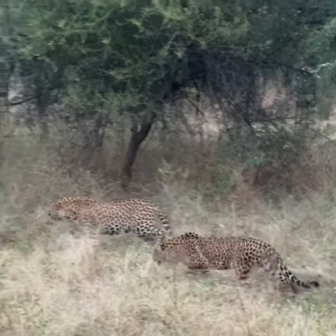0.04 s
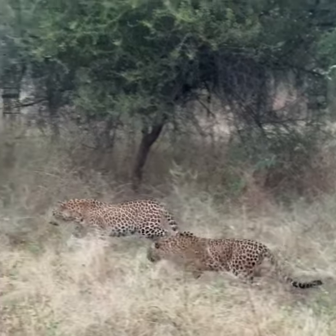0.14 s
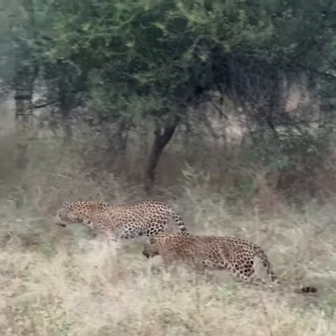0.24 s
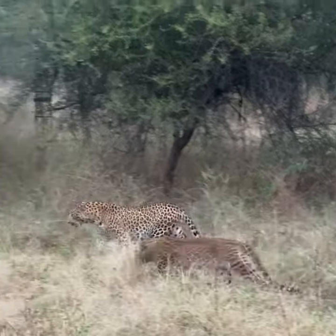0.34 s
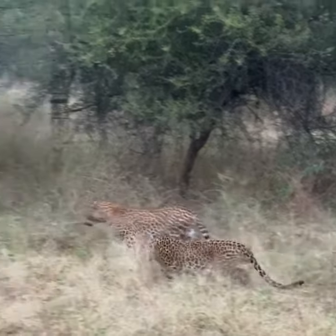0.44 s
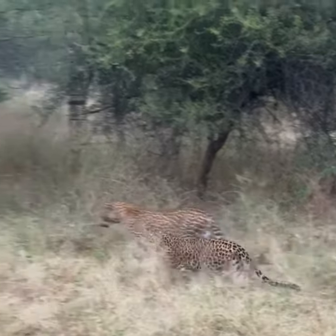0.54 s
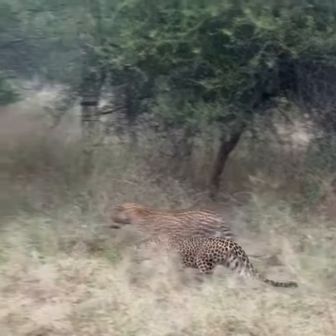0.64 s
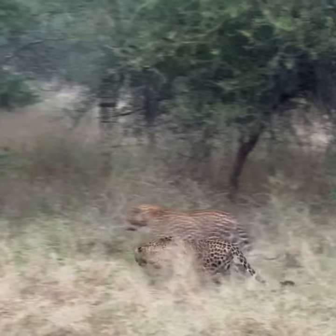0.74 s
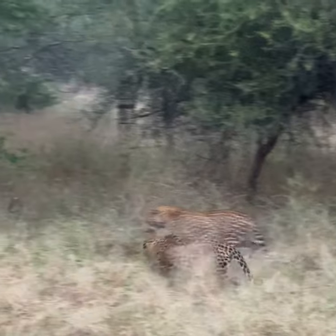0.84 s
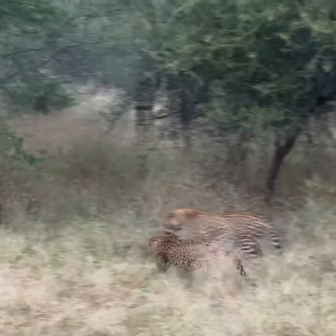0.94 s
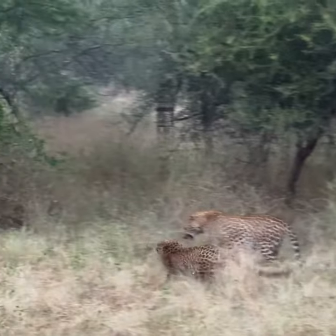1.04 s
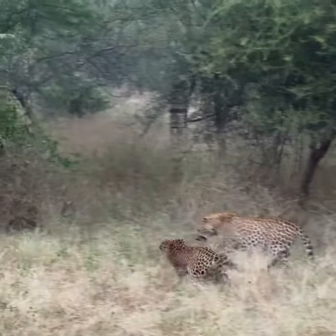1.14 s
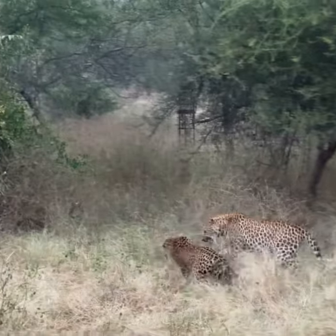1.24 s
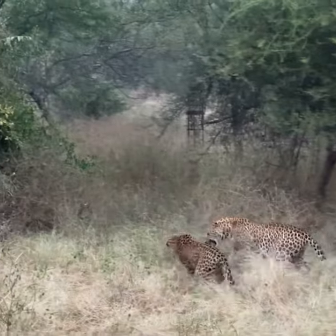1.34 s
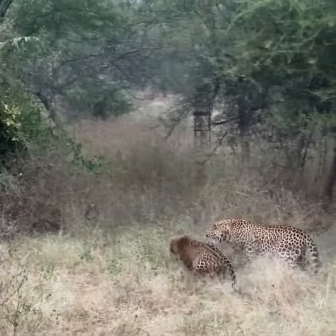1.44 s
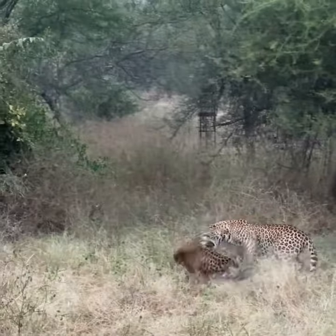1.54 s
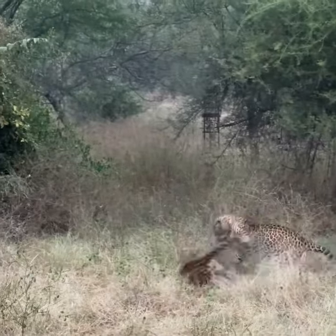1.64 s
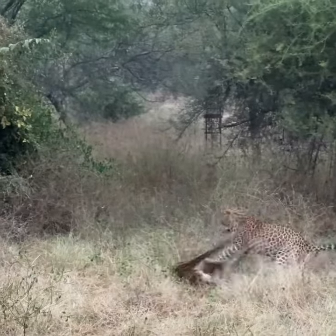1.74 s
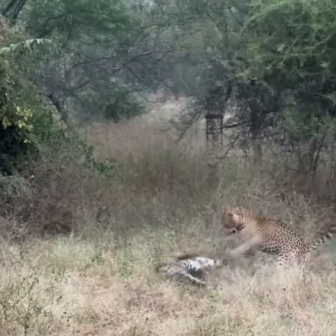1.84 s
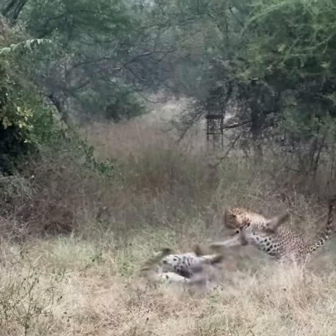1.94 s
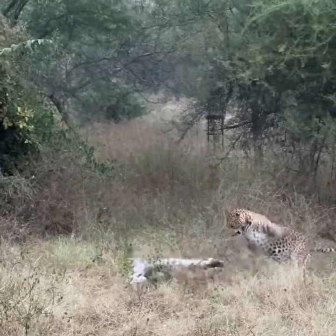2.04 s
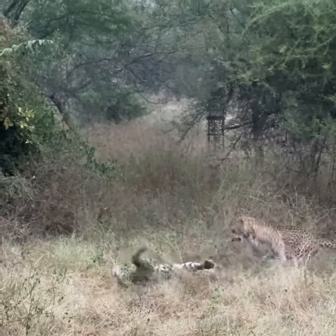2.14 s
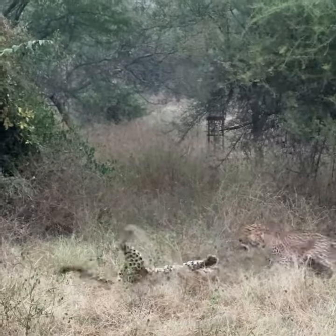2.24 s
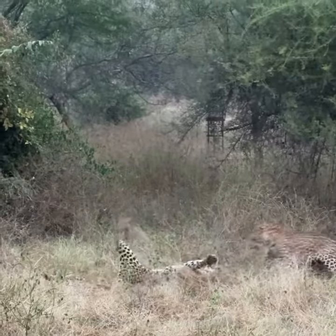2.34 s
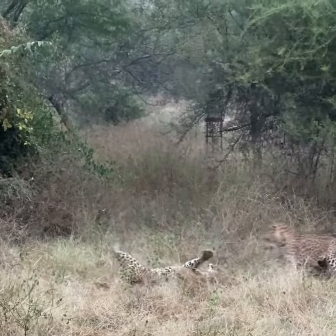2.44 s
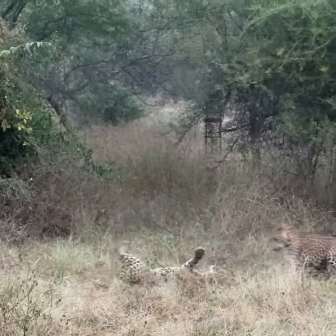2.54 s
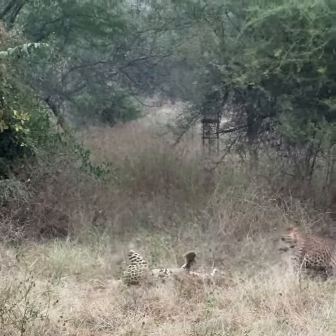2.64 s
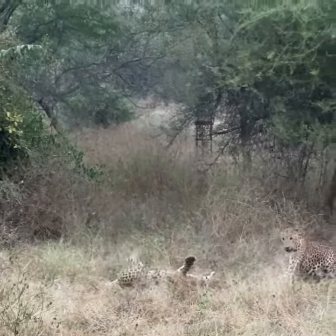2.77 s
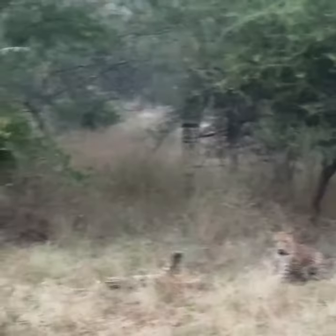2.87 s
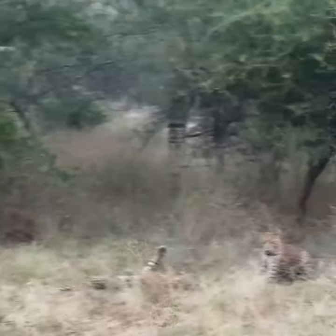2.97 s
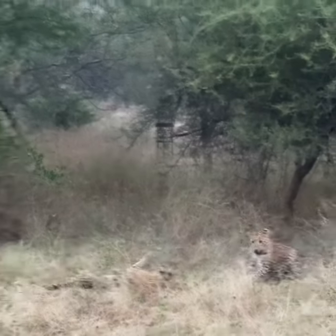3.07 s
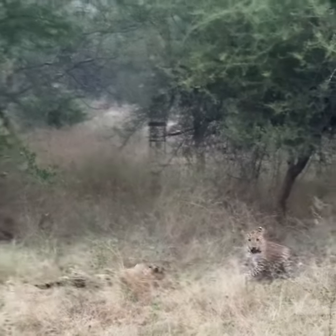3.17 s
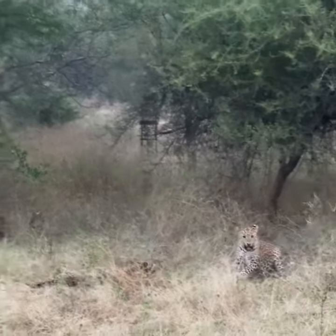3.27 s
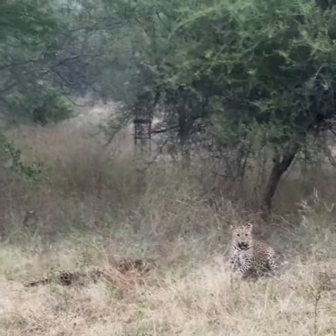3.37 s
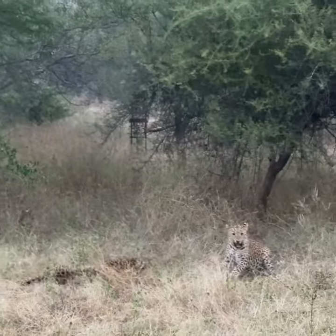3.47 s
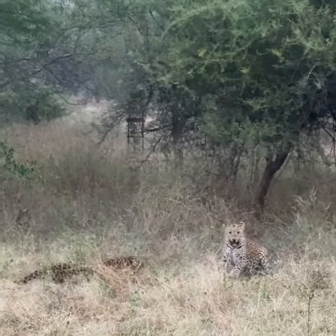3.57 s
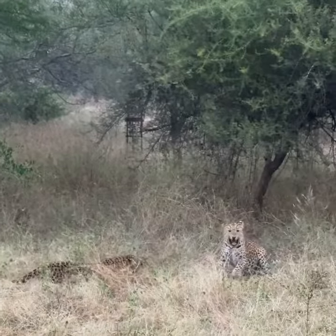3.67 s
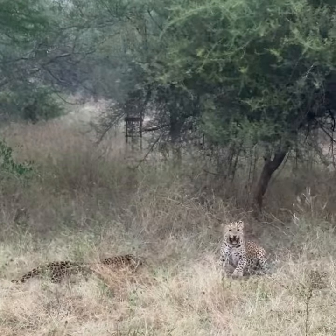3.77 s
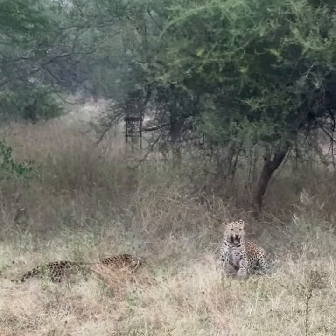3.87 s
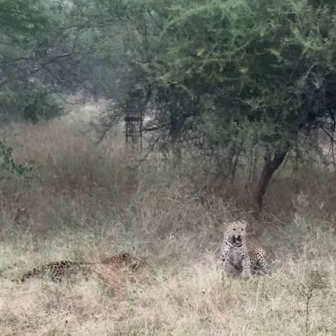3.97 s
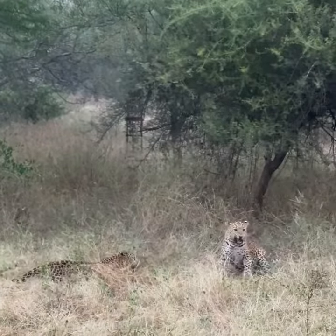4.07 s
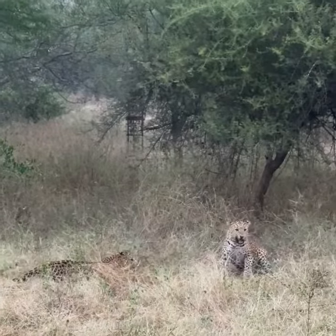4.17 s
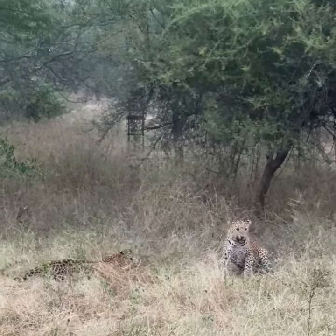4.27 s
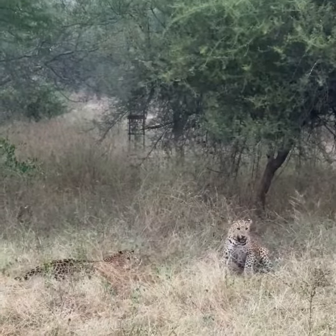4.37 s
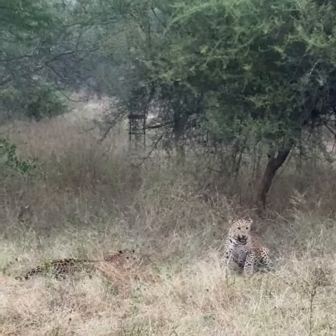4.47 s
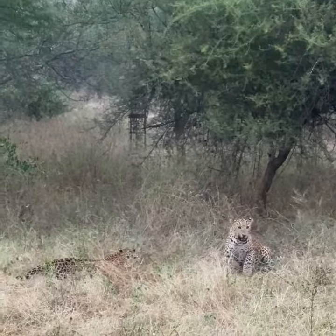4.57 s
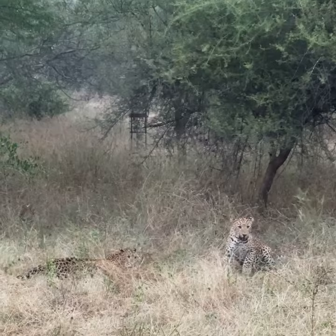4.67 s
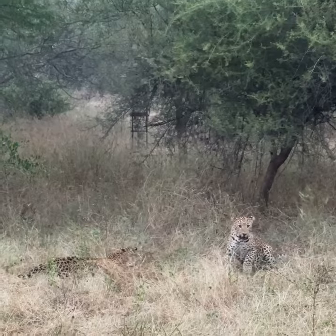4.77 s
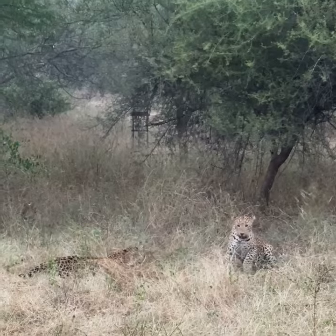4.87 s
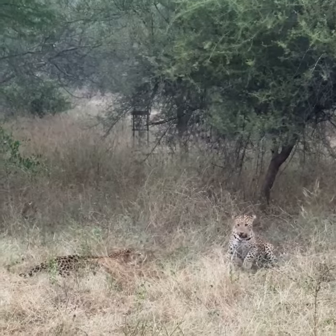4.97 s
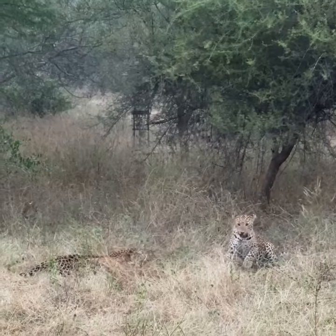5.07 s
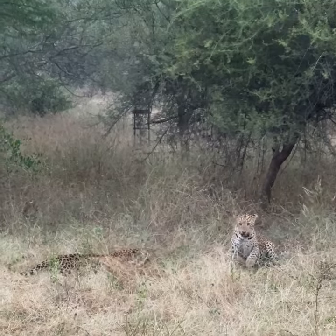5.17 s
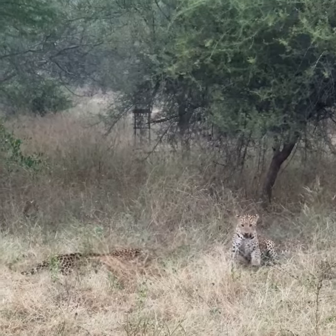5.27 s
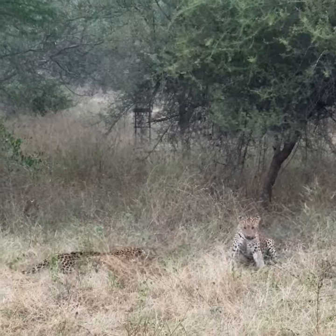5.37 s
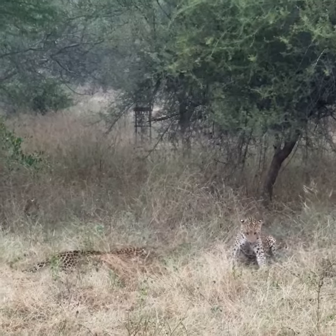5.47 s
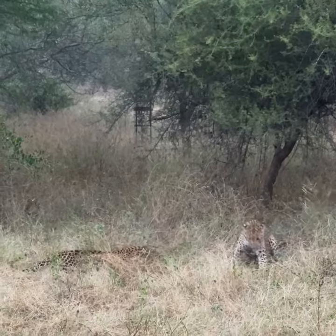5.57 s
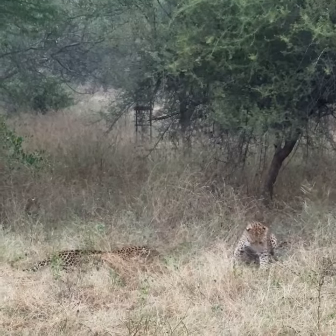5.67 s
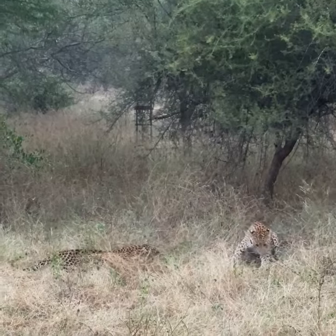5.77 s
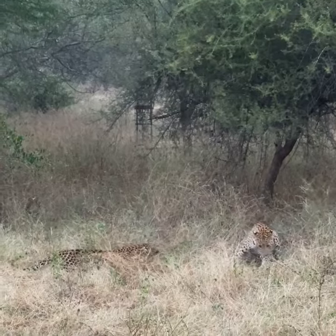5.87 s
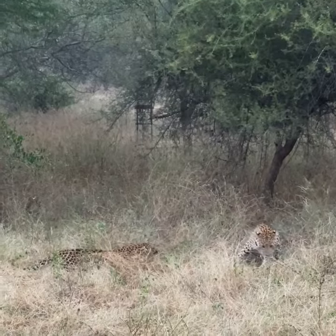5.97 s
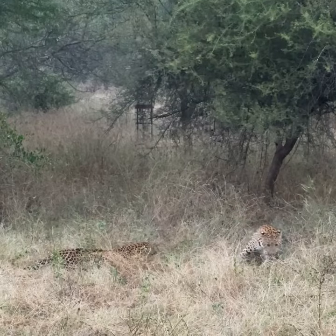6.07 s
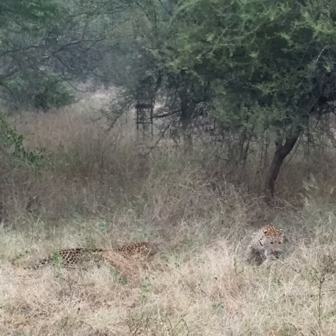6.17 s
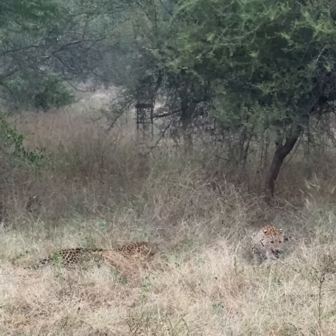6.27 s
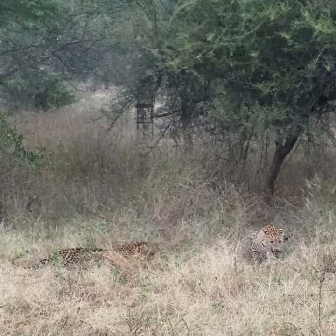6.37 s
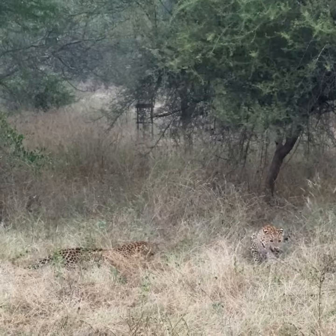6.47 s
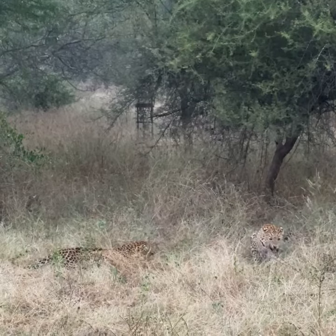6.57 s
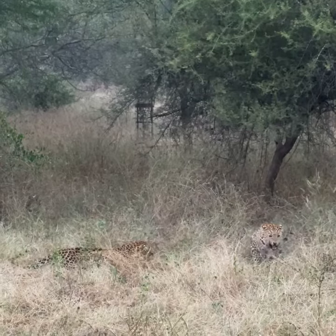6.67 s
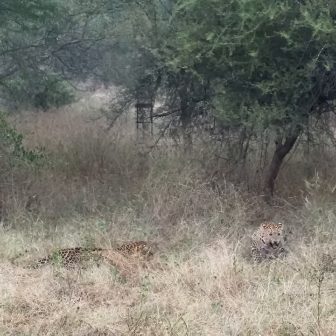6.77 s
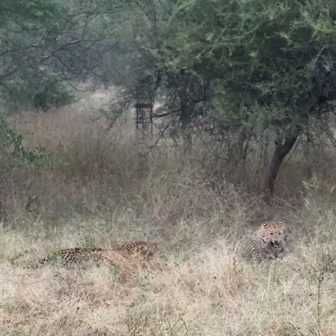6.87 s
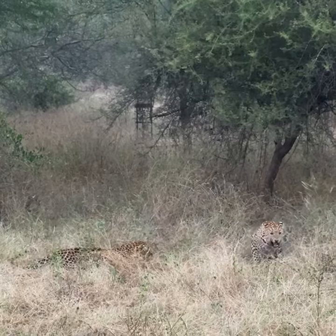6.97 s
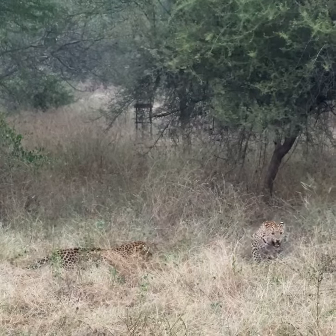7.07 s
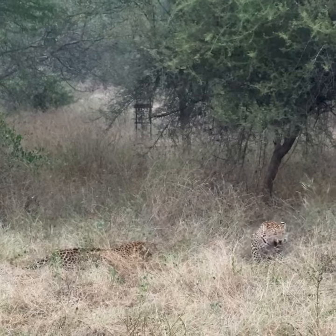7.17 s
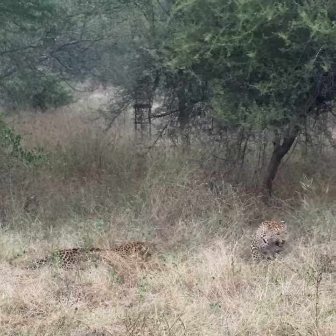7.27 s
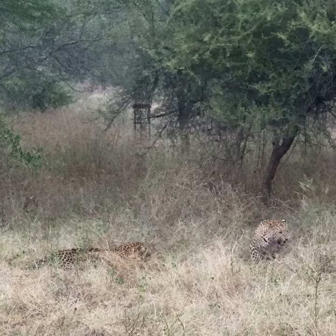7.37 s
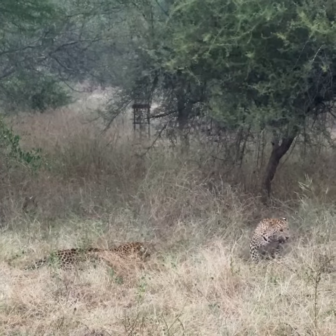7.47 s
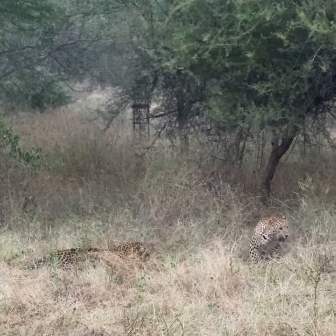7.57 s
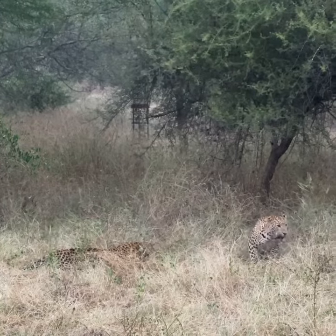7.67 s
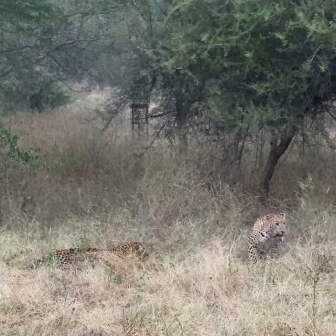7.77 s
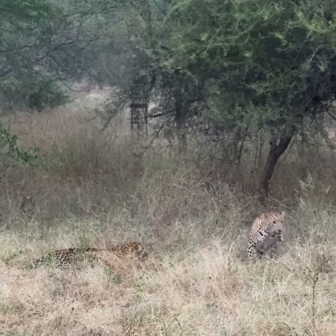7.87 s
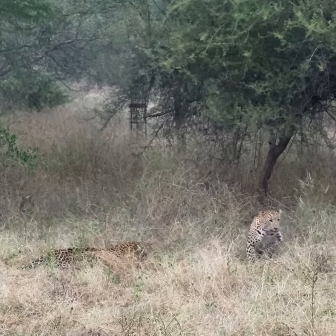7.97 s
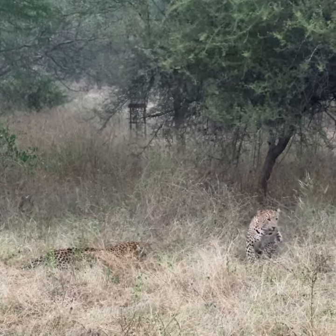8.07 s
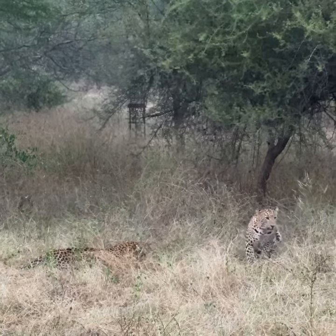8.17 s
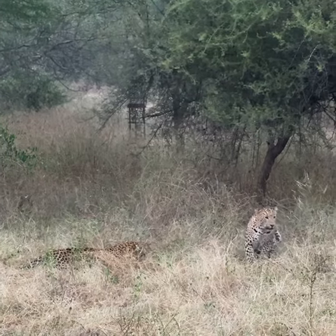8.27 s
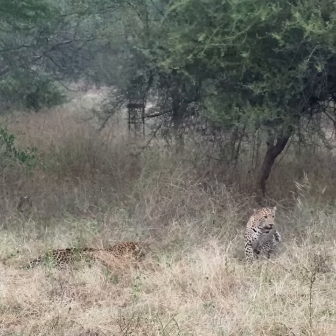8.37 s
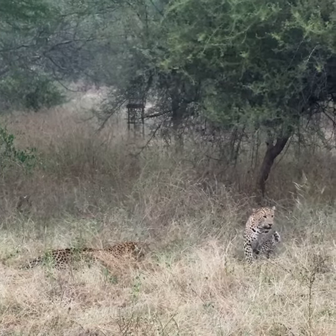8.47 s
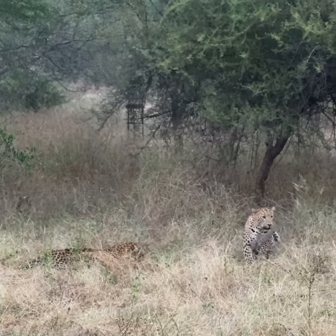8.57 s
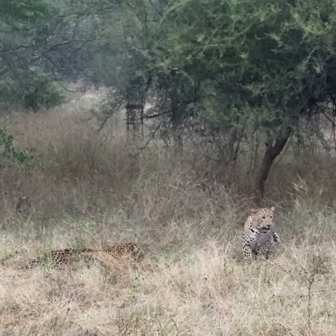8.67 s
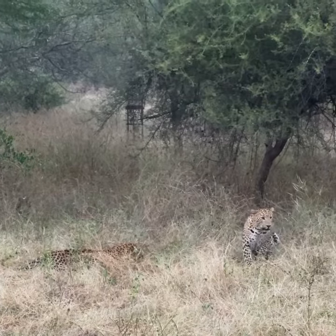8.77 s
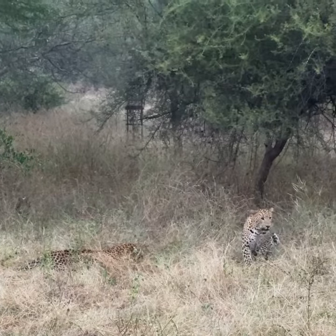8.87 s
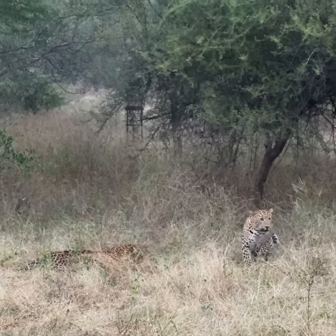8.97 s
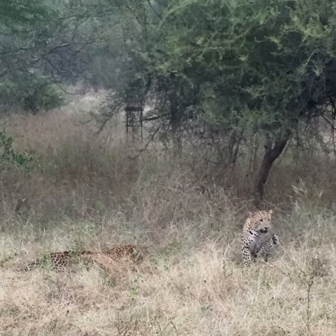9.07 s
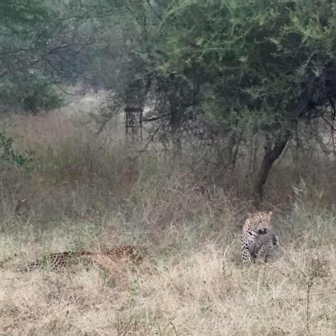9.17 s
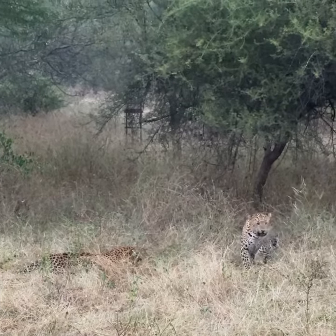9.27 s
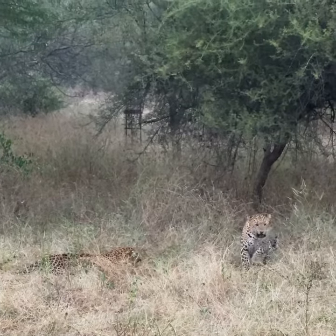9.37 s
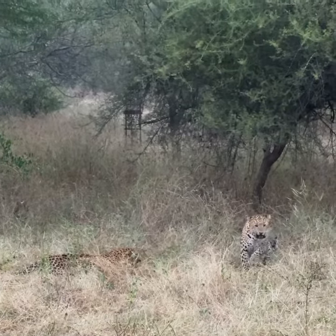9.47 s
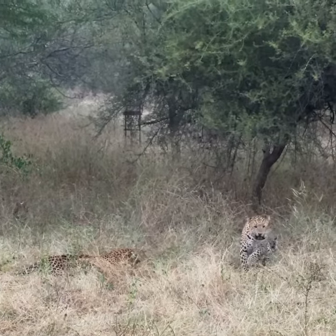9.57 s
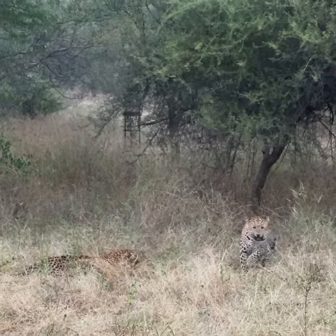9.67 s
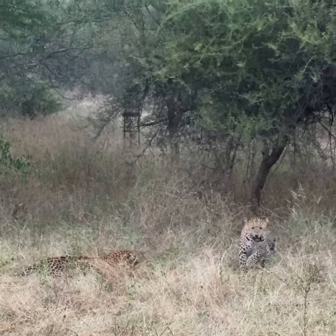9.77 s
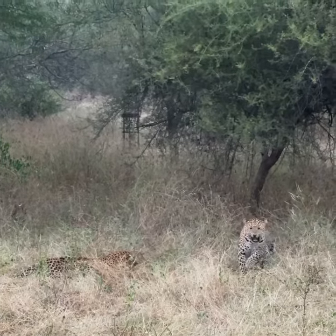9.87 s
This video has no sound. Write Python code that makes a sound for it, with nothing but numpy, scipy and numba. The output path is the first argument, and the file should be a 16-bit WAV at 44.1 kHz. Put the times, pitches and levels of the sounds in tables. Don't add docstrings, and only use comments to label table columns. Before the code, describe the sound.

Outdoors in dry grassland, two leopards grunt and snarl, building within two seconds to a loud, harsh roar as bodies thrash through rustling stems. Rasping groans follow and drop away. A quiet purring rattle swells into a second, smaller growl around five and a half seconds, then only breathy rumbles and soft coughs remain under small birds, faint insects and a breeze. A small stereo microphone hears the cats from one direction.

```python
import sys
import numpy as np
from scipy import signal
from scipy.fft import rfft, irfft
from scipy.io import wavfile
from scipy.ndimage import uniform_filter1d
from numba import njit

SR = 44100
rng = np.random.default_rng(int(sys.argv[2]) if len(sys.argv) > 2 else 0)


def volts_from_db(level):
    exponent = np.asarray(level, float) / 20
    return 10 ** exponent


def to_wav(s):
    ch = np.atleast_2d(s).T
    pcm = np.round(np.clip(ch, -1, 1) * 32767)
    wavfile.write(sys.argv[1], SR, pcm.astype(np.int16))


N = 437472
TIME = np.arange(N) / SR


def noise():
    return rng.standard_normal(N)


def drift(rate_hz):
    points = int(10 * rate_hz) + 2
    return np.interp(TIME * rate_hz, np.arange(points), rng.standard_normal(points))


def in_time(rows):
    start_s, *columns = np.transpose(rows)
    return [np.interp(TIME, start_s, column) for column in columns]


def coloured(x, points):
    freq_hz, level_db = np.transpose(points)
    log_hz = np.log(np.fft.rfftfreq(N, 1 / SR) + 1)
    y = irfft(rfft(x) * volts_from_db(np.interp(log_hz, np.log(freq_hz), level_db)), N)
    return y / np.std(y)


def evened(x, span_s=.09):
    size = int(span_s * SR)
    power = uniform_filter1d(uniform_filter1d(x ** 2, size), size)
    return x / np.sqrt(power + 1e-12)


@njit
def two_pole(x, w, r):
    y = np.zeros(len(x))
    for i in range(2, len(x)):
        push = (1 - r[i] ** 2) / 2 * (x[i] - x[i - 2])
        y[i] = push + 2 * r[i] * np.cos(w[i]) * y[i - 1] - r[i] ** 2 * y[i - 2]
    return y


def resonance(x, centre_hz, width_hz):
    w = 2 * np.pi * centre_hz / SR * np.ones(N)
    r = np.exp(-np.pi * width_hz / SR) * np.ones(N)
    return two_pole(x, w, r)


def tract(x, centre_hz, width_hz, order=2):
    for _ in range(order):
        x = resonance(x, centre_hz, width_hz)
    return x


def edges_db(start_s, hold_s, rise_s, fall_s):
    rise = (TIME - start_s) / rise_s
    fall = (start_s + hold_s - TIME) / fall_s
    return 20 * np.minimum(0, np.minimum(rise, fall))


def cats():
    (throat_db, mouth_db, teeth_db), shape, manner = delivery()
    breath = manner[2]
    snaps, hard = fold_snaps(manner, mouth_db)
    hiss = chopped_breath(manner)
    boom = throat_boom(shape, manner)
    ring = mouth_ring(snaps, hard, hiss, shape, breath)
    teeth = teeth_hiss(snaps, hard, hiss, breath)
    return volts_from_db(throat_db) * evened(boom) + volts_from_db(mouth_db) * evened(ring) + volts_from_db(teeth_db) * evened(teeth)


# voice, start_s, hold_s, level_db, swell_db over the hold, throat_hz
CLASH = [("mutter", 0, 0.3, -47, 2.6, 128), ("grunt", 0.389, 0.4, -38, 5.1, 195),
         ("knock", 0.833, 0.17, -32, 0.99, 160), ("wheeze", 1.041, 0.099, -31.5, .1, 150.5),
         ("snarl", 1.269, 0.177, -32, 2.5, 157), ("bellow", 1.5626, 0.092, -24, 0.11, 147),
         ("gulp", 1.78, 0.03, -30, 0.12, 168), ("bark", 1.845, .05, -24, -5, 430),
         ("roar", 1.97, 0.18, -23, -1.9, 318), ("rasp", 2.274, 0.17, -24, -2.7, 176),
         ("seethe", 2.3, 0.099, -46, .1, 170), ("groan", 2.511, 0.098, -27.5, -3, 163),
         ("huff", 2.717, 0.17, -27, .1, 164), ("rattle", 3.146, .15, -42.5, -6.5, 204)]
# voice, start_s, hold_s, level_db, swell_db over the hold, throat_hz
STANDOFF = [("mutter", 3.44, 0.036, -44, .1, 147), ("hiss", 3.55, 0.34, -57.5, 1.8, 161),
            ("click", 3.96, 0.16, -58, -3, 145), ("purr", 4.387, 0.522, -42, -4, 133.5),
            ("crack", 5.0, 0.38, -34.5, -1.4, 206.5), ("growl", 5.52, 0.49, -30.5, -0.33, 152.7),
            ("seethe", 5.7, 0.13, -55, 0.11, 150), ("seethe", 6.34, 0.037, -62, .1, 148),
            ("hiss", 6.31, 0.067, -64, .1, 150), ("hiss", 6.42, 0.15, -64, .1, 140),
            ("mutter", 6.62, 0.0645, -48.5, .1, 144), ("hiss", 6.83, 0.093, -64.5, 0.11, 110),
            ("rattle", 6.9, 0.41, -45.5, 4.4, 206), ("rumble", 7.6, 0.688, -38.5, -8, 126.2),
            ("hum", 8.35, .65, -50, .1, 165), ("cough", 9.11, 0.08, -40.5, .1, 161),
            ("hum", 9.3, .14, -49, -.5, 168), ("mutter", 9.48, 0.41, -48.5, 0.44, 151)]
MANNER = {"mutter": (.65, .3, .85, 3), "grunt": (.45, .3, .5, 2), "knock": (.3, .3, .08, 1.5),
          "snarl": (.9, .3, .35, 3), "bellow": (.8, .3, .6, 3), "groan": (.5, .3, .4, 2.5),
          "bark": (.85, .3, .45, 3.5), "roar": (.85, .3, .45, 3.5), "rasp": (.85, .3, .45, 2.5),
          "rattle": (.1, .3, .75, 2), "hiss": (.6, .3, 1, 5), "click": (.1, .7, .25, 3),
          "purr": (.15, .53, .05, 4), "growl": (.45, .17, .33, 2), "seethe": (.6, .3, 1, 4),
          "wheeze": (.3, .3, .7, 2), "rumble": (.3, .3, .95, 3.5), "hum": (.38, .3, .95, 3),
          "cough": (.1, .33, .08, 3), "huff": (.25, .3, .3, 2), "crack": (.55, .33, .3, 4.5),
          "gulp": (.9, .3, .5, 2.5)}
SHAPE = {"mutter": (1.156, 307, 810, 1290, 0.99), "grunt": (0.994, 406, 965, 1280, 1.073),
         "knock": (0.91, 337, 755, 1215, 0.98), "seethe": (1.02, 327, 890, 1224, 1.03),
         "wheeze": (0.934, 340, 783, 1210, 1.02), "snarl": (1.056, 468, 880, 1340, 0.98),
         "bellow": (1, 290, 856, 1347, .99), "groan": (0.98, 477, 830, 1420, .96),
         "bark": (0.71, 240, 850, 1295, 1.03), "roar": (0.86, 162, 830, 1415, 0.93),
         "rasp": (0.975, 434, 862, 1490, .97), "rattle": (0.918, 345, 790, 1330, 0.9),
         "hiss": (0.99, 322, 890, 1224, 1.07), "click": (0.51, 290, 1045, 1270, 0.88),
         "purr": (0.94, 343, 1040, 1325, 1.005), "growl": (0.982, 378, 892, 1500, 0.716),
         "rumble": (1.21, 100, 1200, 1290, 1.07), "hum": (0.973, 274, 1200, 1350, 0.9),
         "cough": (1.02, 312, 890, 1400, .92), "huff": (0.974, 317, 792, 1207, 0.93),
         "crack": (0.758, 387, 1065, 1430, 1.04), "gulp": (1.1, 327, 770, 1380, 0.96)}
BALANCE = {"mutter": (-1.5, -24.5, -5, -23, -26.5), "grunt": (-9, -16, -3, -24.5, -27.5),
           "knock": (-11, -13, 6, -18, -29), "seethe": (-1.5, -8, .6, -17, -.1),
           "wheeze": (-8.5, -12, 6, -20, -22.5), "snarl": (-10, -13.5, 1, -11.5, -18.5),
           "bellow": (-15, -6.5, -2.5, -8, -19), "groan": (-15, -23, 1, -18.5, -28.5),
           "bark": (-20, -4.5, -7.5, 3, -16), "roar": (-18.5, -6, -6, -8, -16.5),
           "rasp": (-14.5, -16.5, 0.5, -9, -19), "rattle": (-10, -13, -23, -25, -31),
           "hiss": (0, -7, 1.5, -1.5, -6.5), "click": (2, -23, -9, 3, -2),
           "purr": (-7, -30.5, -6, -23.5, -33), "growl": (-7, -13, -12.5, -18.5, -25),
           "rumble": (-12, -52, -12, -36.5, -34.5), "hum": (-12.5, -28, 4, -37, -32.5),
           "cough": (-2, -15.5, -11, -19.5, -29.5), "huff": (-11.5, -15.5, 1.5, -19, -21),
           "crack": (-4, -16, -7, -23.5, -25), "gulp": (-11, -12.5, -13, -14, -40)}
EDGES = {"mutter": (0.093, 0.03), "grunt": (0.078, 0.1), "knock": (0.059, 0.11), "seethe": (.15, 0.18),
         "wheeze": (0.058, 0.12), "snarl": (0.1, .1), "bellow": (0.21, 0.11), "groan": (0.12, 0.066),
         "bark": (0.029, 0.043), "roar": (0.16, 0.086), "rasp": (0.15, 0.2), "rattle": (0.095, 0.12),
         "hiss": (0.15, 0.11), "click": (0.043, 0.15), "purr": (0.26, 0.099), "growl": (0.018, 0.144),
         "rumble": (0.13, 0.043), "hum": (0.13, 0.11), "cough": (.1, 0.096), "huff": (0.076, .12),
         "crack": (0.09, 0.13), "gulp": (0.13, .1)}
MOUTH_FOLLOWS, TEETH_FOLLOW = 1.21, 1.22
GLIDE_CURVE, SECOND_GAIN = 1.37, 6.7
GLIDE_S = 0.041


def delivery():
    power = np.full((3, N), 1e-14)
    loudest_db = np.full(N, -np.inf)
    voice = np.zeros((11, N))
    for name, start_s, hold_s, level_db, swell_db, throat_hz in CLASH + STANDOFF:
        glide, jaw_hz, second_hz, third_hz, third_glide = SHAPE[name]
        chest_db, jaw_db, second_db, mouth_db, teeth_db = BALANCE[name]
        along = np.clip((TIME - start_s) / hold_s, 0, 1)
        effort_db = edges_db(start_s, hold_s, *EDGES[name]) + swell_db * along
        mouth_layer_db = mouth_db + MOUTH_FOLLOWS * effort_db
        teeth_layer_db = teeth_db + TEETH_FOLLOW * effort_db
        power += volts_from_db(level_db + np.array([effort_db, mouth_layer_db, teeth_layer_db])) ** 2
        presence_db = 2 * level_db + effort_db + mouth_layer_db
        leads = presence_db > loudest_db
        loudest_db[leads] = presence_db[leads]
        settings = [throat_hz, jaw_hz, second_hz, third_hz, chest_db, jaw_db, second_db, *MANNER[name]]
        voice[:, leads] = np.array(settings)[:, None]
        voice[0, leads] *= glide ** along[leads]
        sink_db = -20 * np.log10(third_glide) * along[leads] ** GLIDE_CURVE
        voice[3, leads] *= volts_from_db(-sink_db)
        voice[6, leads] += SECOND_GAIN * sink_db
    shape = uniform_filter1d(voice[:7], int(GLIDE_S * SR), axis=1)
    return 10 * np.log10(power), shape, voice[7:]


# first_s, last_s, beats between
RUNS = [(.008, .269, 6), (.332, .555, 6), (.624, 1.126, 16), (1.159, 1.225, 2), (1.274, 1.455, 4),
        (1.522, 1.676, 5), (1.72, 1.81, 2), (1.85, 2.194, 13), (2.229, 2.403, 5), (2.441, 2.48, 1),
        (2.504, 2.691, 7), (2.714, 3.135, 16), (3.179, 4.144, 22), (4.238, 4.613, 10), (4.653, 4.933, 7),
        (4.982, 5.49, 14), (5.518, 5.846, 10), (5.881, 6.124, 7), (6.15, 6.838, 18), (6.878, 7.391, 12),
        (7.466, 7.814, 10), (7.853, 8.051, 5), (8.1, 9.058, 22), (9.112, 9.524, 10), (9.56, 9.704, 4),
        (9.746, 11.021, 30)]


def fold_cycles(time_s):
    first_s, last_s, count = np.transpose(RUNS)
    done = np.cumsum(count + 1) - 1
    ends_s = np.c_[first_s, last_s].ravel()
    return np.interp(time_s, ends_s, np.c_[done - count, done].ravel())


def pulses(cycles, delay, share, uneven_db, jitter_s):
    halves = np.floor(2 * (cycles - delay))
    at = np.flatnonzero(np.diff(halves) > 0)
    chance = rng.standard_normal((700, 2))[:len(at)]
    size = np.where(halves[at + 1] % 2, share[at], 1) * volts_from_db(uneven_db[at] * chance[:, 0])
    late = (jitter_s * SR * chance[:, 1]).astype(int)
    out = np.zeros(N)
    out[np.clip(at + late, 0, N - 1)] = size
    return out


def throat_boom(shape, manner):
    throat_hz, jaw_hz, _, _, chest_db, jaw_db, _ = shape
    share, _, breath, uneven_db = manner
    cycles = fold_cycles(TIME + 1.5 / throat_hz)
    puffs = evened(pulses(cycles, 0, share, uneven_db, .0014)) + (.14 + .3 * breath) * noise()
    boom = tract(puffs, throat_hz * volts_from_db(0.7 * drift(25)), 0.51 * throat_hz, order=3)
    boom += volts_from_db(chest_db + 6.0) * tract(puffs, 65.9, 27.2)
    boom -= volts_from_db(-9) * tract(puffs, 119.1, 40.7)
    boom += volts_from_db(jaw_db) * tract(puffs, jaw_hz * volts_from_db(.5 * drift(22)), 97.0)
    return boom


def wet_tail(clicks):
    return signal.lfilter([1], [1, -np.exp(-1 / (.0012 * SR))], clicks + 1e-18)


def fold_snaps(manner, mouth_db):
    share, delay, _, uneven_db = manner
    snaps = pulses(fold_cycles(TIME), delay, share ** 1.5, uneven_db + 1.5, .001)
    spit = noise()
    hard, apart = slaps(mouth_db)
    snaps = 0.65 * apart * evened(snaps + .25 * wet_tail(snaps) * spit)
    return snaps, hard + .15 * spit * wet_tail(hard)


# start_s, peak_db
SLAPS = [(0.82, -43), (0.852, -35.5), (0.882, -37), (0.914, -36), (0.946, -39.5), (0.977, -35),
         (1.071, -38), (1.27, -34.5), (1.332, -33.5), (1.354, -34), (1.378, -27.5), (1.416, -29),
         (1.533, -30), (1.708, -37), (1.816, -22), (1.841, -18), (1.933, -28), (1.946, -20.5), (1.998, -24),
         (2.012, -21), (2.025, -14), (2.268, -24.5), (2.83, -34.5), (4.408, -56), (4.446, -56), (4.52, -46),
         (4.559, -52), (4.595, -52), (4.637, -58), (4.755, -52), (4.795, -59), (4.916, -53), (4.993, -43),
         (5.01, -40.5), (5.049, -43), (5.106, -40), (5.178, -44.5), (5.212, -45), (5.247, -43),
         (5.367, -45), (5.402, -48), (5.542, -32), (5.561, -33), (5.625, -35), (5.787, -35), (5.818, -38),
         (5.885, -36.5), (5.919, -33), (5.955, -37), (5.991, -39), (6.029, -39.5), (9.084, -47),
         (9.126, -44), (9.171, -50), (9.23, -56)]
SLAP_GAIN_DB = 18.0


def slaps(mouth_db):
    start_s, peak_db = np.transpose(SLAPS)
    at = (start_s * SR).astype(int)
    out = np.zeros(N)
    out[at] = volts_from_db(peak_db - mouth_db[at] + SLAP_GAIN_DB)
    apart = uniform_filter1d(1. * (out > 0), size=SR // 50) < 1e-9
    return out, apart


def chopped_breath(manner):
    _, delay, breath, _ = manner
    phase = 4 * np.pi * (fold_cycles(TIME) - delay - .08)
    gate = 1 + .6 * (1 - breath ** 3) * np.cos(phase)
    return evened(gate * noise())


def mouth_ring(snaps, hard, hiss, shape, breath):
    throat_hz, _, second_hz, third_hz, _, _, second_db = shape
    source = np.sqrt(1 - breath) * snaps + np.sqrt(breath) * hiss + hard
    gape = np.clip(throat_hz / 170, 1, 1.9) ** 2 + 3 * breath ** 3
    gape *= volts_from_db(np.minimum(3 * breath, 1) * (2 + 3 * drift(14)))
    second_hz = second_hz * volts_from_db(.6 * breath * drift(15))
    third_hz = third_hz * volts_from_db(.5 * breath * drift(15))
    third = resonance(tract(source, third_hz, 530.0, order=1), third_hz, 25.4 * gape)
    second = resonance(tract(source, second_hz, 570.0, order=1), second_hz, 29.0 * gape)
    ring = (third - volts_from_db(second_db) * second) * np.sqrt(1 / gape)
    soft = volts_from_db(-7.0) * tract(source, 512.0, 474.0) + volts_from_db(-12.0) * tract(hiss, 1274.0, 890.0)
    return ring + np.sqrt(breath) * soft


# centre_hz, width_hz, level_db
TEETH = [(1900, 420, 9), (2320, 253, 13), (2670, 300, 9), (3362, 123, 9.5), (3850, 59, 4.5)]


def teeth_hiss(snaps, hard, hiss, breath):
    wide = np.clip(2.1 * breath + .15, 0, 1)
    source = np.sqrt(1 - wide) * snaps + np.sqrt(wide) * hiss + volts_from_db(-5.5) * hard
    bared = breath == 1
    sway = volts_from_db(.2 * drift(5) + 2.2 * bared)
    teeth = volts_from_db(2.5) * np.sqrt(wide) * tract(source, 2650.0 * sway, 4500.0)
    for k, (centre_hz, width_hz, level_db) in enumerate(TEETH):
        gain = volts_from_db(level_db + 4 * drift(9) - 9 * bared * (k == 0)) * (-1) ** k
        teeth += gain * tract(source, centre_hz * sway * volts_from_db(.3 * drift(35)), 1.3 * width_hz)
    return teeth


def grass():
    return rustle() + cracking()


# start_s, hold_s, level_db
BRUSHES = [(0, 0.83, -65.5), (0.732, 0.092, -61.5), (1.085, 0.31, -54.5), (1.525, 0.17, -49),
           (1.881, 0.27, -49), (2.29, 0.14, -49), (2.682, 0.062, -49.5), (3.042, 1.21, -74),
           (4.5, .4, -84.5), (5.288, 0.068, -76), (5.565, 0.14, -73.5), (5.734, 0.13, -62),
           (6.287, 0.22, -70), (6.76, 0.61, -79), (7.49, 0.12, -77.5), (8.04, 0.032, -82),
           (8.57, 0.022, -74), (8.963, 0.015, -71.5), (9.34, 0.037, -77.5), (9.75, 0.03, -76.5)]
# freq_hz, level_db
RUSTLE = [(3600, -6), (4700, -5.5), (6500, -13.5), (8000, 1.5), (10200, -2.5), (11500, -7), (12800, -48),
          (14000, -45)]


def rustle():
    grains = noise() * volts_from_db(1.9 * drift(250) + 3.7 * drift(30))
    power = np.zeros(N)
    for start_s, hold_s, level_db in BRUSHES:
        power += volts_from_db(level_db + edges_db(start_s, hold_s, rise_s=0.19, fall_s=0.3)) ** 2
    return volts_from_db(2.0) * np.sqrt(power) * coloured(grains, RUSTLE)


# start_s, peak_db
CRACKS = [(0.248, -38), (0.2603, -34.5), (0.2712, -41), (0.865, -45), (1.999, -34), (2.013, -36.5),
          (2.026, -32.5), (2.041, -34), (2.258, -36.5), (2.521, -33.5), (2.5437, -33.5), (2.7014, -31.5),
          (3.029, -44.5), (4.037, -50), (4.0844, -42), (6.0455, -42.5), (6.287, -45.5), (6.316, -44.5),
          (6.9387, -41), (6.999, -44.5), (7.899, -47.5), (8.0444, -41.5), (8.081, -48), (8.466, -46),
          (8.5849, -42.5), (8.619, -44.5), (8.9467, -45.5), (8.976, -42.5), (9.019, -47.5), (9.34, -44.5),
          (9.3605, -40.5), (9.463, -49.5), (9.7448, -43.5), (9.763, -40.5), (9.7898, -46)]


def cracking():
    burst, after_s = np.zeros(N), np.arange(400) / SR
    for start_s, peak_db in CRACKS:
        i = round(start_s * SR)
        burst[i:i + 400] += volts_from_db(peak_db - 8.0) * np.exp(-((after_s - .0012) / 0.0041) ** 2)
    spectrum = [(700, -39), (1500, 3.5), (3000, 6.0), (6000, -2.5), (10000, 9.0), (12500, -12.0), (15000, -37)]
    return burst * coloured(noise(), spectrum)


def note(start_s, shape, level_db, fade_s):
    point_s, pitch_hz = np.transpose(shape)
    end_s = point_s[-1]
    on = slice(max(0, int(start_s * SR)), int((start_s + end_s) * SR) + 1)
    t = TIME[on] - start_s
    fade = np.clip(np.minimum(t, end_s - t) / fade_s, 0, 1)
    phase = 2 * np.pi * np.cumsum(np.interp(t, point_s, pitch_hz)) / SR
    out = np.zeros(N)
    out[on] = volts_from_db(level_db + 8.0) * fade * np.sin(phase)
    return out


def birds():
    out = (small_bird() + hooting_bird() + twitter()) * volts_from_db(5 * drift(150) - 3)
    trees = rng.standard_normal(SR // 2) * np.exp(-TIME[:SR // 2] / 0.18)
    return out + volts_from_db(-44) * signal.fftconvolve(out, trees)[:N]


# point_s from note start, pitch_hz
FLICK = [(0, 4290.5), (.012, 4707), (.028, 6293), (.04, 4499), (.065, 3491)]
SWOOP = [(0, 5600), (.028, 4900), (.05, 5100), (.067, 6050), (.077, 6100), (.092, 4440), (.105, 4300)]
WHISTLE = [(0, 4010), (.28, 3725)]
# start_s, level_db
FLICKS = [(0, -70), (3.116, -76.5), (4.103, -73.5), (8.316, -76.5), (9.29, -73)]
SWOOPS = [(.135, -68.5), (3.251, -70.5), (4.241, -72), (6.158, -70), (7.171, -78), (8.455, -73.5),
          (9.423, -71.5)]
WHISTLES = [(-.17, -73.5), (3.801, -75.5), (9.018, -76)]


def small_bird():
    out = np.zeros(N)
    for shape, sung in ((FLICK, FLICKS), (SWOOP, SWOOPS), (WHISTLE, WHISTLES)):
        for start_s, level_db in sung:
            out += note(start_s, shape, level_db, fade_s=0.0056)
    return out


# start_s, length_s, pitch_hz, level_db
HOOTS = [
    (8.518, 0.053, 561, -58.5),
    (8.642, 0.06, 535, -57.5),
    (8.763, 0.077, 540.3, -57.5),
]


def hooting_bird():
    out = note(8.6, [(0, 1076), (.06, 1105), (.19, 1100)], -74, fade_s=.04)
    for start_s, length_s, pitch_hz, level_db in HOOTS:
        for multiple, rel_db in ((3, -1.5), (2, -13), (10, -28)):
            tone_hz = pitch_hz * multiple
            shape = [(0, .91 * tone_hz), (.018, tone_hz), (length_s, tone_hz)]
            out += note(start_s, shape, level_db + rel_db, fade_s=0.0043)
        out += note(start_s - .014, [(0, 1900), (.02, 1940)], level_db - 6.0, fade_s=0.0065)
    return out


# start_s, pitch_hz, level_db
CHIPS = [(7.42, 7400, -81), (7.49, 7300, -80), (7.525, 7400, -72), (7.59, 7340, -60.5), (7.625, 7350, -74),
         (7.65, 6200, -71), (7.69, 6060, -77), (7.62, 3900, -79), (7.69, 3850, -76), (7.725, 3880, -77),
         (7.762, 3870, -70.5), (7.838, 3980, -68.5), (8.13, 4580, -85), (8.82, 4650, -80)]
CHIP_S = 0.0093


def twitter():
    out = np.zeros(N)
    for start_s, pitch_hz, level_db in CHIPS:
        out += note(start_s, [(0, 1.07 * pitch_hz), (CHIP_S, .94 * pitch_hz)], level_db, fade_s=0.0034)
    return out


# start_s, low_kind_db, high_kind_db
INSECTS = [(0, -78.5, -88), (3.5, -92, -96), (4.2, -86, -95), (4.3, -75, -95), (4.45, -82, -94),
           (4.75, -92, -95), (6.2, -84, -91), (6.35, -81.5, -78), (6.7, -79, -85), (6.9, -76.5, -94),
           (7.3, -79, -84), (7.5, -74.5, -94), (8.3, -75.5, -90), (8.8, -73.5, -92), (9.9, -92, -95)]


def insects():
    low_db, high_db = in_time(INSECTS)
    low = volts_from_db(low_db + 1.5 * drift(19)) * evened(tract(noise(), 2290.0, 340.0))
    high = volts_from_db(high_db + 2.7 * drift(30)) * evened(tract(noise(), 5700.0, 490.0))
    return low + high


# freq_hz, level_db per Hz
BUSH = [(20, -42), (55, 5.5), (120, 4), (250, -6.5), (500, -22.5), (2300, -27), (3200, -34), (4500, -37.5),
        (7000, -54), (10000, -58), (13000, -54)]
# start_s, level_db
BUSH_LEVEL = [
    (3.9, 2.5),
    (4.3, -5.5),
    (4.9, -5.5),
    (5.6, 10.5),
    (6.3, 1.2),
    (8.4, 3),
]
BUSH_DB = -56.5


def breeze():
    return volts_from_db(BUSH_DB + in_time(BUSH_LEVEL)[0] + 3.5 * drift(11)) * coloured(noise(), BUSH)


SCATTER_DB, SCATTER_HZ, SCATTER_S = -6, 2600, .008


def scattered(wave):
    smear = rng.standard_normal(SR // 20) * np.exp(-TIME[:SR // 20] / SCATTER_S)
    bright = signal.lfilter(*signal.butter(2, SCATTER_HZ, "high", fs=SR), wave)
    return volts_from_db(SCATTER_DB) * signal.oaconvolve(bright, smear / np.linalg.norm(smear))[:N]


def scene():
    wave = cats() + grass() + birds() + insects() + breeze()
    return wave + scattered(wave) * [[1], [-1]]


# freq_hz, left_lead_rad
PORT_PHASE = [(100, 0), (350, -.13), (600, 0), (2100, 0), (2670, .7), (3620, .3), (4390, 1.2), (5000, 3.4),
              (5510, 6.2), (6370, 6.3), (8350, 9.3), (9560, 9.4), (9820, 6.3), (10600, 7.3), (11600, 12.5),
              (13100, 12.6)]
# freq_hz, left_over_right_db
PORT_BALANCE = [(200, 0), (340, -.6), (520, -2.4), (1000, -2.3), (1500, -1.4), (2000, 0)]


def two_ports(dry):
    bins_hz = np.fft.rfftfreq(N, 1 / SR)
    lead_rad = np.interp(bins_hz, *np.transpose(PORT_PHASE))
    tilt_db = np.interp(bins_hz, *np.transpose(PORT_BALANCE))
    left = volts_from_db(tilt_db / 2) * np.exp(.5j * lead_rad)
    direct = dry.mean(axis=0)
    return irfft(rfft(direct) * np.array([left, 1 / left]), N) + dry - direct


def band_limit(x):
    return signal.sosfilt(signal.butter(12, 13600, fs=SR, output="sos"), x)


def record(dry):
    mix = .36 * np.tanh(two_ports(dry) / .36)
    return band_limit(mix)


dry = scene()
out = record(dry)
to_wav(out)
```